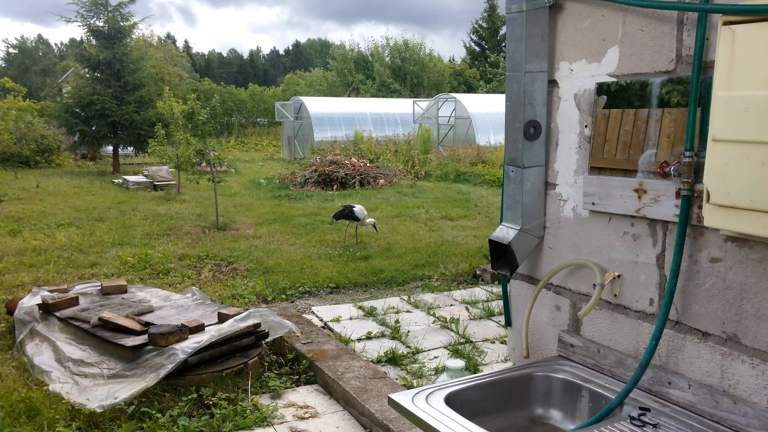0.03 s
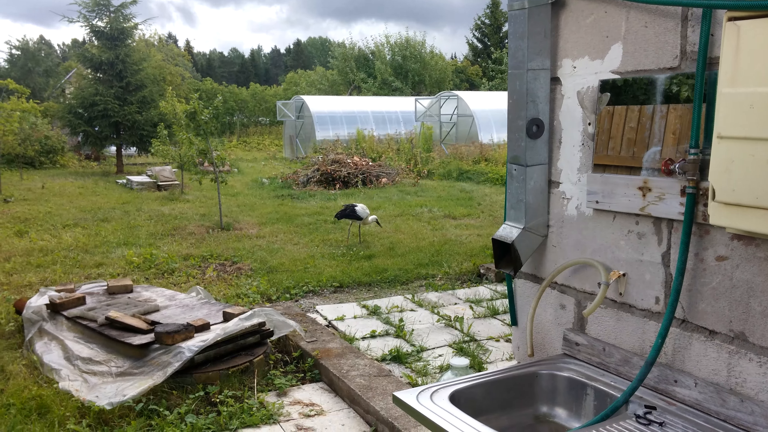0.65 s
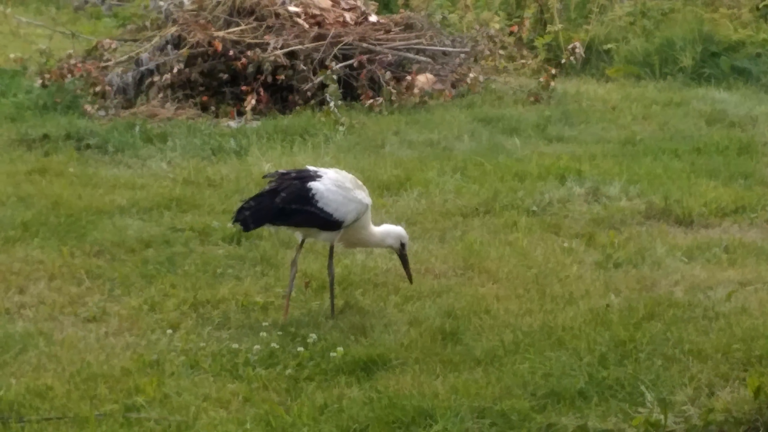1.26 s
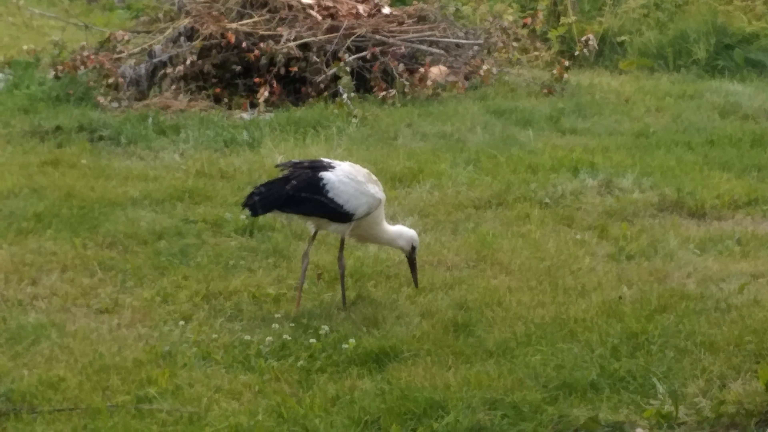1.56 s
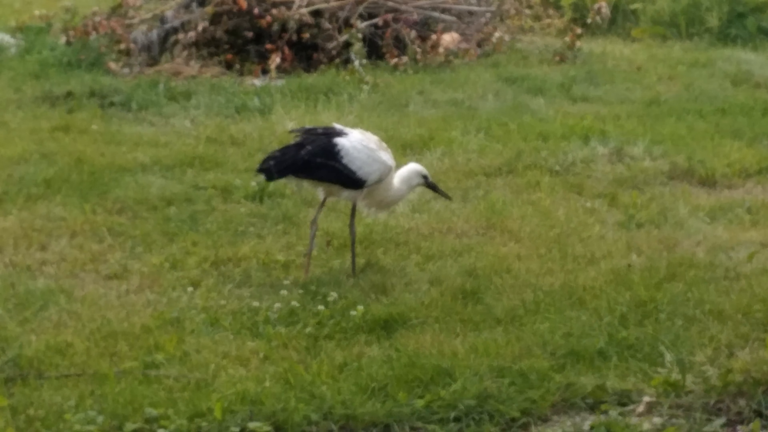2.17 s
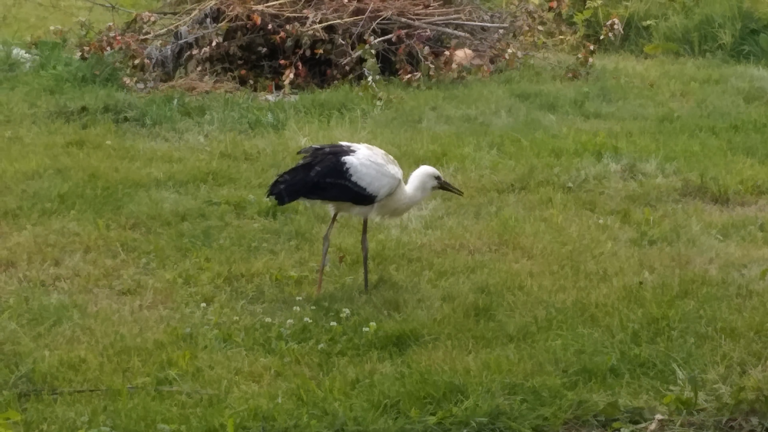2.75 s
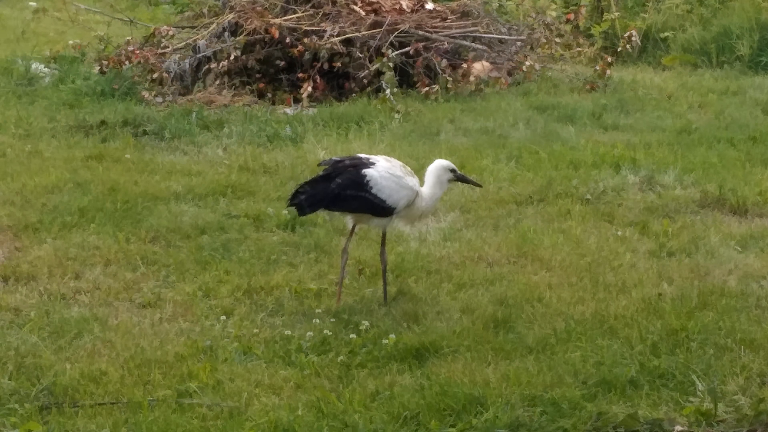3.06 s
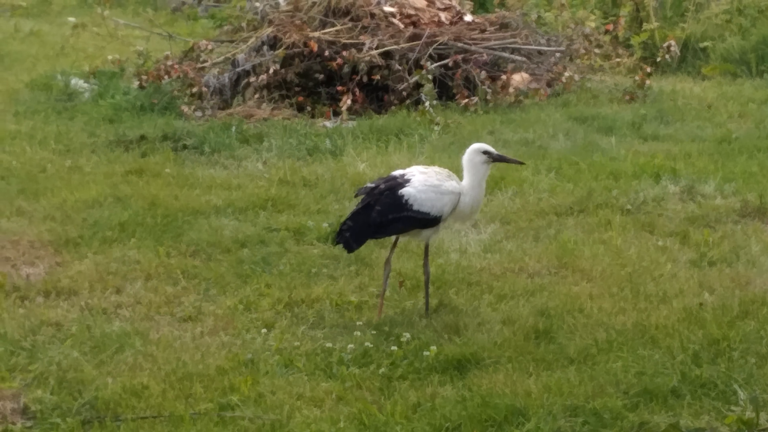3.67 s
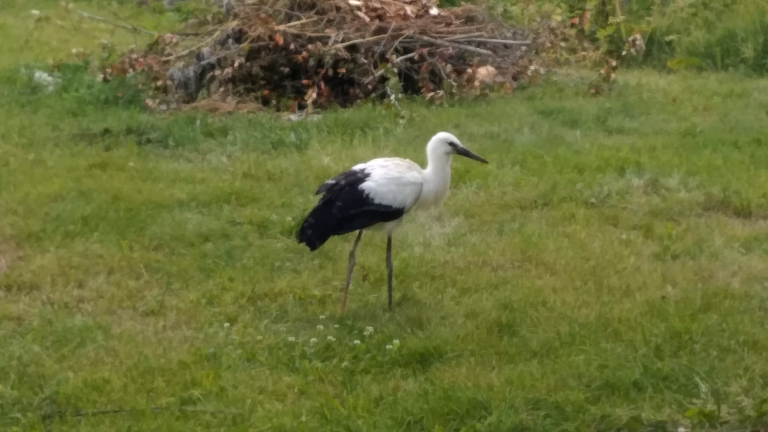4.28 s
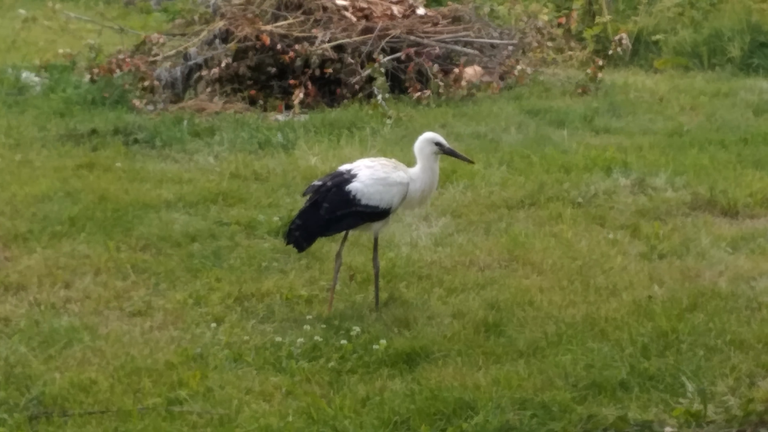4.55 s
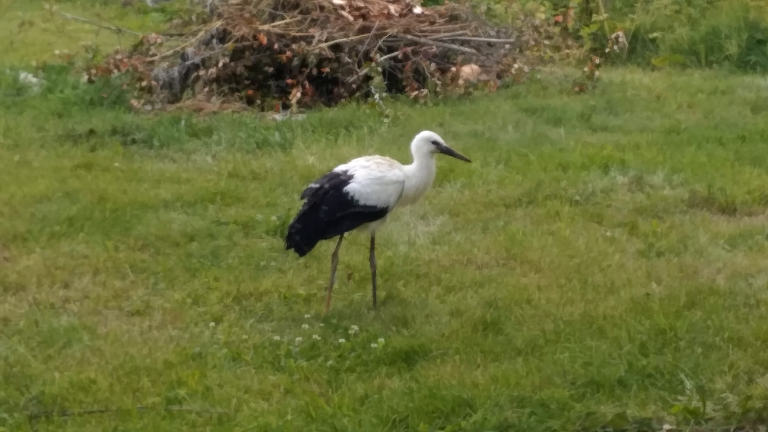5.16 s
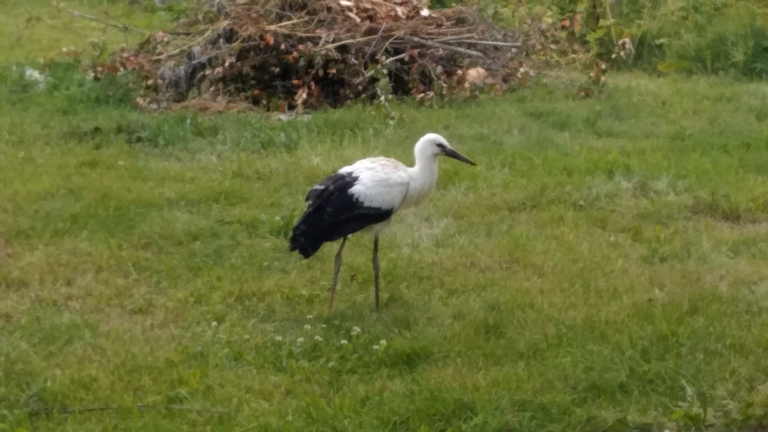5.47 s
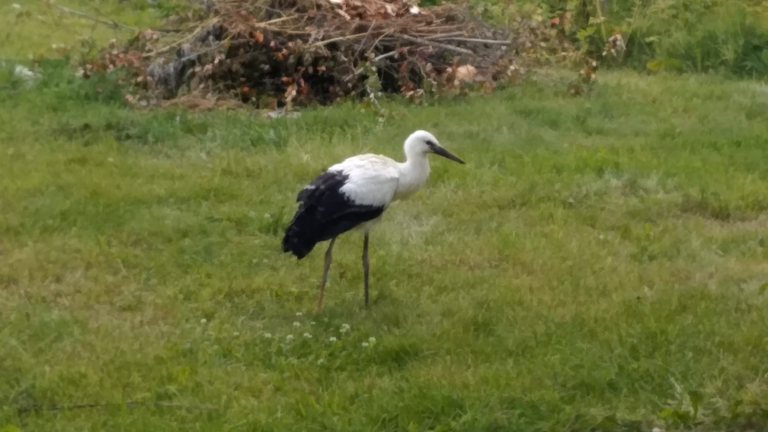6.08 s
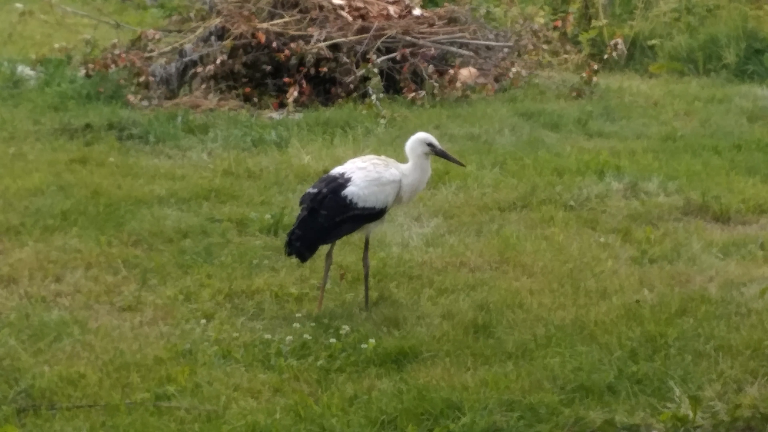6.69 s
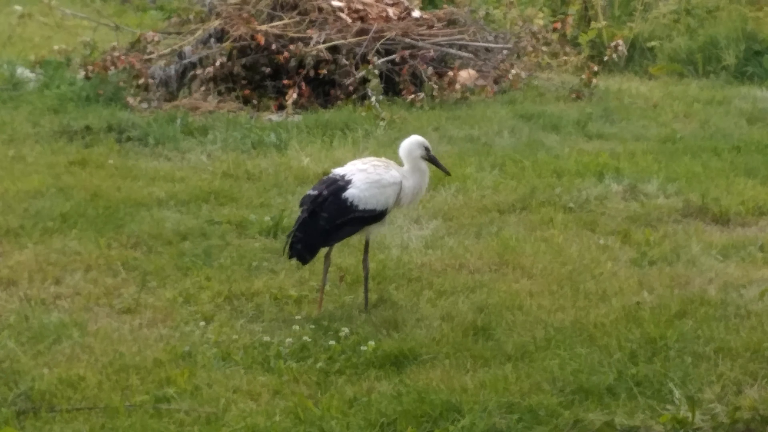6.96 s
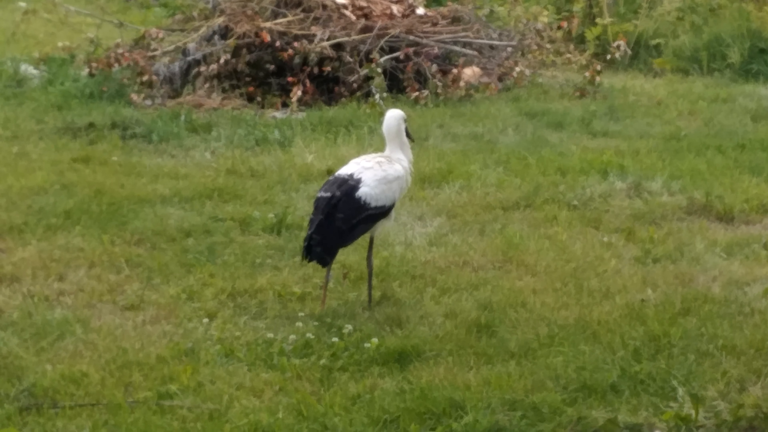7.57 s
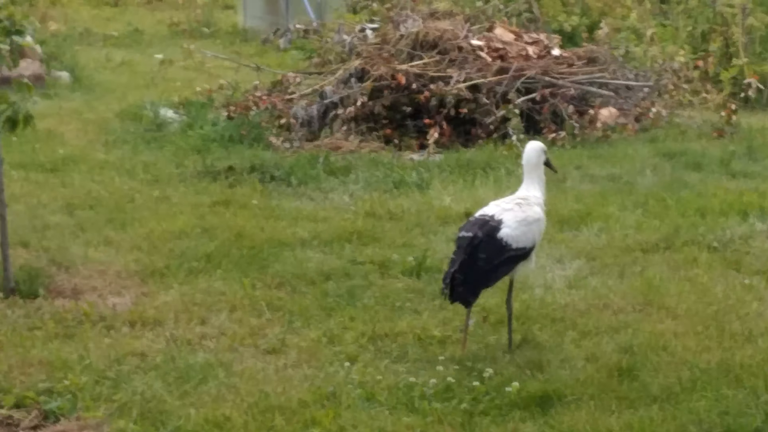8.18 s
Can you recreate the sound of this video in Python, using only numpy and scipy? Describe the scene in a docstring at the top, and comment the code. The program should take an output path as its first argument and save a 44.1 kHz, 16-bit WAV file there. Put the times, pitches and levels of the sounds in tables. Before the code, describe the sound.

A quiet yard fades in with a low breeze, a thin hiss of leaves and the rumble of a hand holding the microphone. Soft knocks, dull whooshes and a few barely audible distant whistles come and go. A hard tick sounds past the middle. The wind then turns quieter and wider, a loud click strikes on the left, and the grip shifts softly.

```python
"""A quiet garden yard in light wind, taken on a hand-held phone with two microphones.
The recorder fades in on distant air and leaves, with the hand rumbling on the case. At 0.7 s it zooms:
the microphones merge to mono and the gain rises, so the yard seems closer. Fingers bump the case, soft
whooshes and faint far whistles pass, and a hard touch ticks. At 6 s it falls back to stereo; then a
sharp tap on the left microphone port overloads it, and the grip shifts with a dull rub at the end."""
import sys
import numpy as np
from scipy import signal
from scipy.fft import rfft, irfft
from scipy.io import wavfile
from scipy.ndimage import uniform_filter1d, map_coordinates

SR = 44100
rng = np.random.default_rng(int(sys.argv[2]) if len(sys.argv) > 2 else 0)


def to_wav(s):
    """Save 16-bit WAV."""
    ch = np.atleast_2d(s).T  # columns
    pcm = np.round(np.clip(ch, -1, 1) * 32767)  # PCM
    wavfile.write(sys.argv[1], SR, pcm.astype(np.int16))


N = 367353

# Source levels are those at the microphones, ahead of the zoom gain.
# wind over the yard and in far trees: (frequency [Hz], relative level [dB])
AIR_SPECTRUM = [(25, -28), (50, -9.5), (120, -2.5), (290, 0.5), (450, -2), (700, -.5), (1050, -5.7),
                (1400, -13.3), (1750, -12.2), (2300, -15), (3500, -16), (6200, -26), (7600, -33.5),
                (15500, -45)]
# stereo width of that wind: (frequency [Hz], side minus mid [dB])
AIR_WIDTH = [(60, -17), (200, -13.5), (700, -9), (1290, 1), (2400, .5), (15000, -1)]
# the breeze briefly swells or drops in the leaves: (time [s], level change [dB])
RUSTLES = [(1.06, 1.2), (1.19, -2.8), (1.72, 2), (2.9, 1.8), (3.5, 1.5), (3.78, 1.6), (3.99, 2.2),
           (4.28, 2.4), (4.75, 1.8), (5.27, 2.2)]
# hand and wind on the case: (frequency [Hz], relative level [dB])
RUMBLE_SPECTRUM = [(30, -33), (45, -14), (60, -1), (100, 0), (180, 1), (280, -8), (450, -14), (900, -29),
                   (2500, -53), (15000, -75)]
# steady rumble, easing as the hand settles: (time [s], level [dB])
GRIP_LEVEL = [(1.0, -68), (3.0, -65.5), (3.9, -66.5), (4.5, -73), (6.1, -70), (6.8, -80)]
# shifts of the grip: (peak time [s], level [dB], decay [s])
GRIP_SHIFTS = [(1.04, -60, .05), (2.04, -66, .08), (3.46, -63, .04), (3.78, -63, .06), (4.02, -64, .06),
               (5.05, -64, .06), (5.56, -60, .06), (5.95, -60, .08), (8.008, -54, .014), (8.18, -50, .025),
               (8.26, -50, .1)]
# extra microphone gain during the zoom: (time [s], gain [dB])
ZOOM_GAIN = [(.74, 0), (.82, 2.2), (.94, 2.2), (1.02, 7.4), (5.997, 7.5), (6.02, 0)]
# soft bumps on the case: (time [s], peak level [dB], ring frequency [Hz])
BUMPS = [(.8799, -29.3, 170), (.9704, -35.5, 155), (3.446, -45, 140), (3.7505, -43.5, 149),
         (3.7786, -43, 138), (4.054, -53, 60), (5.044, -49.5, 160), (5.512, -49, 100), (5.548, -51, 100),
         (5.575, -47.5, 120), (7.734, -55, 110), (8.001, -45, 160)]
# colour of the dull rushes: (frequency [Hz], relative level [dB])
RUSH_SPECTRUM = [(50, -11.5), (130, -8), (280, 1), (420, -4), (620, -2), (900, -8.5), (1200, -15),
                 (1550, -23), (2500, -29.5), (6000, -53), (15000, -75)]
# dull rushes: passing whooshes, and at 8.2 s the rub of the shifting grip:
# (peak time [s], level [dB], rise [s], decay [s])
DULL_RUSHES = [(1.04, -53.5, .03, .05), (1.234, -52, .005, .17), (1.625, -46, .008, .1),
               (2.21, -44, .056, .052), (2.42, -63, .08, .2), (4.65, -63, .45, .65), (8.2, -60, .03, .15)]
# far whistles: (time [s], length [s], start pitch [Hz], end pitch [Hz], level [dB])
WHISTLES = [(1.28, .25, 1190, 1366, -69), (1.31, .11, 3530, 3515, -74), (1.63, .072, 3505, 3510, -74),
            (2.46, .08, 3500, 3540, -70.5), (2.55, .06, 3530, 3540, -78), (3.85, .06, 3520, 3530, -78),
            (4.08, .2, 2860, 2878, -76.5), (5.45, .1, 3510, 3520, -78)]
# hard ticks on the case: (time [s], peak level [dB], contact [ms], ring frequency [Hz], bandwidth [Hz])
TICKS = [(4.8838, -27.3, .19, 1080, 280), (4.89, -43, .085, 2500, 1800), (8.166, -46, .2, 500, 700)]
# resonances of the microphone port: (frequency [Hz], bandwidth [Hz], gain [dB])
PORT_MODES = [(143, 219, 0), (3930, 170, -14.3), (3830, 1320, -15.6)]

MERGE_S, SPLIT_S = .719, 6.007  # the microphones are mono between these times


def undb(db):
    """Decibels to gain."""
    return 10 ** (np.asarray(db) / 20)


def curve(rows):
    """Rows of (time [s], value) joined by straight lines, one value per sample."""
    return np.interp(np.arange(N) / SR, *np.transpose(rows))


def colour(x, spectrum):
    """Filter by (frequency [Hz], gain [dB]) points on a log-frequency axis."""
    hz, db = np.transpose(spectrum)
    bin_hz = np.maximum(np.arange(N // 2 + 1) * SR / N, 1)
    gain = undb(np.interp(np.log(bin_hz), np.log(hz), db))
    return irfft(rfft(x) * gain, N)


def noise(spectrum):
    """Coloured noise of rms 1."""
    x = colour(rng.standard_normal(N), spectrum)
    return x / np.std(x)


def wander(rate):
    """Smooth random motion through `rate` points a second, with a spread near 1."""
    knots = rng.standard_normal(N // 10)
    return map_coordinates(knots, [np.arange(N) / SR * rate], order=2, mode="mirror")


def swell(peak_s, rise_s, decay_s):
    """Envelope with a rounded rise to 1 and an exponential decay."""
    t = np.arange(N) / SR - peak_s
    exponent = np.where(t < 0, (t / rise_s) ** 2, t / decay_s)
    return np.exp(-np.minimum(exponent, 40))


def ring(x, hz, width_hz):
    """One resonance, gain 1 at its centre."""
    damping = width_hz / hz
    b, a = signal.bilinear([damping, 0], [1, damping, 1], .5 / np.tan(np.pi * hz / SR))
    return signal.lfilter(b, a, x + 1e-18)


def low_cut(x, hz, order):
    """High-pass: slow pressure leaks away."""
    return signal.sosfilt(signal.butter(order, hz, "high", fs=SR, output="sos"), x + 1e-18)


def contact_force(start, contact_ms):
    """Force of a touch: a rise to 1 over contact_ms and a slower release."""
    age = np.clip((np.arange(N) / SR - start) * 1000 / contact_ms, 0, 50)
    return age * np.exp(1 - age)


def strike_case(start, peak_db, contact_ms, hz, width_hz):
    """One contact rings the phone's case; little sounds below the ring."""
    ringing = ring(contact_force(start, contact_ms), hz, width_hz)
    knock = low_cut(ringing, .77 * hz, order=2)
    return undb(peak_db) * knock / np.abs(knock).max()


def air(level_db=-58.8, eddy_db=.74, sway_db=.3, split_hz=1200, rustle_s=.06):
    """Distant wind: a low eddying roar, alike at both microphones, under a wide hiss of leaves."""
    t = np.arange(N) / SR
    mid, side = noise(AIR_SPECTRUM), colour(noise(AIR_SPECTRUM), AIR_WIDTH)
    mics = np.array([mid + side, mid - side])
    breeze_db = sum(db * np.exp(-((t - at) / rustle_s) ** 2) for at, db in RUSTLES)
    lows = signal.sosfiltfilt(signal.butter(2, split_hz, fs=SR, output="sos"), mics)
    leaves = (mics - lows) * undb(breeze_db + sway_db * wander(9))
    roar = lows * undb(.85 * breeze_db + eddy_db * wander(14))
    return (roar + leaves) * undb(level_db)


def grip_rumble(shudder_db=2.5, unshared_db=-5, right_bias_db=6):
    """Hand and wind shake the case right at the microphones, harder when the grip shifts."""
    shared = noise(RUMBLE_SPECTRUM)
    mics = np.array([shared + undb(unshared_db) * noise(RUMBLE_SPECTRUM) for _ in range(2)])
    pan = undb(np.array([[-right_bias_db], [right_bias_db]]) / 2)
    shift_power = sum((undb(db) * swell(at, .7 * decay, decay)) ** 2 for at, db, decay in GRIP_SHIFTS)
    envelope = np.sqrt(undb(curve(GRIP_LEVEL)) ** 2 + shift_power)
    return mics * pan * envelope * undb(shudder_db * wander(28))


def self_noise(level_db=-77):
    """The recorder's own white hiss, separate in each channel."""
    return rng.standard_normal((2, N)) * undb(level_db)


def fade_in(open_s=.575, fade_s=.245, dropout_db=-27, dropout_s=.009):
    """The recorder's gain opens from silence, with a brief dropout as the microphones merge."""
    t = np.arange(N) / SR
    fade_db = np.interp(t, [open_s, open_s + fade_s], [-14.5, 0], left=-90)
    dip_db = dropout_db * np.exp(-((t - MERGE_S) / dropout_s) ** 2)
    return undb(fade_db + dip_db)


def bumps(contact_cycles=.085, width_share=.6):
    """The hand thuds on the case; a softer touch lasts longer and rings lower."""
    return sum(strike_case(start, db, 1000 * contact_cycles / hz, hz, width_share * hz)
               for start, db, hz in BUMPS)


def dull_rushes(flutter_db=.6):
    """Centred swells of dull, fluttering noise: soft whooshes, and last the rub of the shifting grip."""
    power = sum((undb(db) * swell(at, rise, decay)) ** 2 for at, db, rise, decay in DULL_RUSHES)
    return noise(RUSH_SPECTRUM) * np.sqrt(power) * undb(flutter_db * wander(45))


def whistles(waver_hz=34, flicker_db=3):
    """Thin notes from far off that swell and fade, made unsteady by the moving air."""
    t, notes = np.arange(N) / SR, np.zeros(N)
    drift_hz = waver_hz * wander(150)
    flicker = undb(flicker_db * wander(60))
    for start, length, from_hz, to_hz, db in WHISTLES:
        on = (t > start) & (t < start + length)
        progress = (t[on] - start) / length
        hz = from_hz + (to_hz - from_hz) * progress + drift_hz[on]
        envelope = undb(db) * np.sqrt(2 * np.sin(np.pi * progress))
        notes[on] += envelope * np.sin(2 * np.pi * np.cumsum(hz) / SR)
    return notes * flicker


def ticks():
    """Short, hard contacts ring the case higher than the bumps."""
    return sum(strike_case(*tick) for tick in TICKS)


def port_tap(start=6.51884, contact_ms=.012, gain_db=33.3, leak_hz=45, duct_hz=4900):
    """A tap right on the left port: the pressure jump leaks away as the narrow duct rings and dulls it."""
    duct = signal.butter(2, duct_hz, fs=SR, output="sos")
    force = signal.sosfilt(duct, contact_force(start, contact_ms))
    pressure = sum((-1) ** k * undb(db) * ring(force, hz, width_hz)  # modes alternate in sign
                   for k, (hz, width_hz, db) in enumerate(PORT_MODES))
    left = undb(gain_db) * low_cut(pressure, leak_hz, order=4)
    return np.array([left, np.zeros(N)])


def scene():
    """The distant yard and the close handling, as they reach the two microphones."""
    return air() + grip_rumble() + bumps() + dull_rushes() + whistles() + ticks() + port_tap()


def record(dry, top_hz=15800):
    """The phone's zoom lifts the scene and narrows it to mono; peaks saturate and the top is cut."""
    t = np.arange(N) / SR
    left, right = (dry * undb(curve(ZOOM_GAIN)) + self_noise()) * fade_in()
    in_stereo = (t < MERGE_S) | (t > SPLIT_S)
    width = uniform_filter1d(in_stereo.astype(float), size=660)  # 15 ms crossfades
    mid, side = (left + right) / 2, (left - right) / 2 * width
    zoomed = np.array([mid + side, mid - side])
    saturated = zoomed / (1 + zoomed ** 8) ** (1 / 8)
    return signal.sosfilt(signal.ellip(8, .1, 70, top_hz, fs=SR, output="sos"), saturated)


dry = scene()
out = record(dry)
to_wav(out)
```